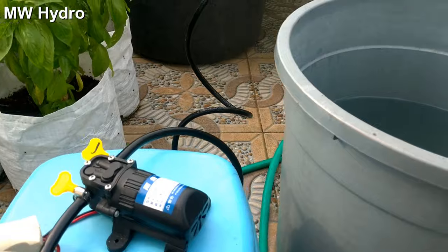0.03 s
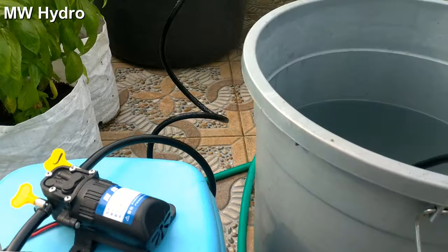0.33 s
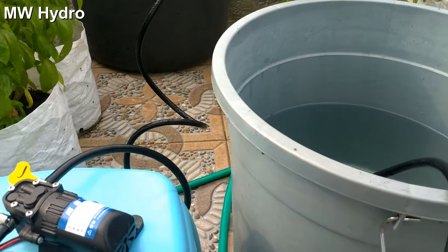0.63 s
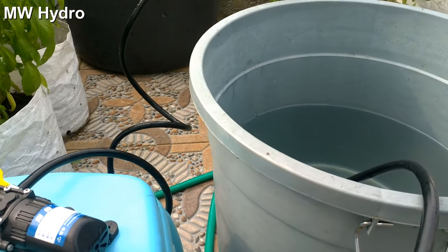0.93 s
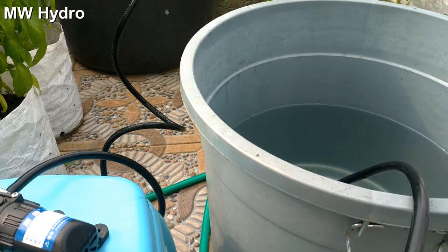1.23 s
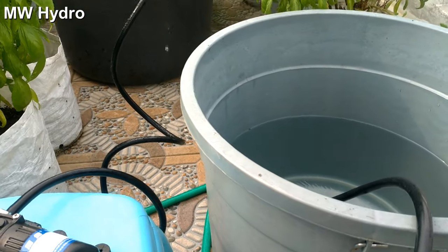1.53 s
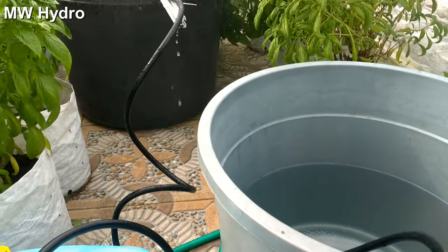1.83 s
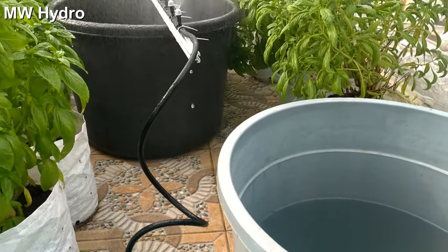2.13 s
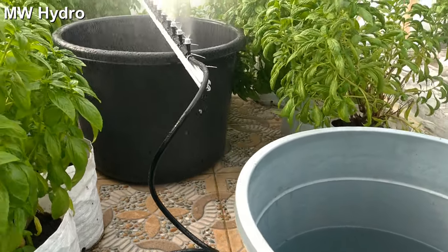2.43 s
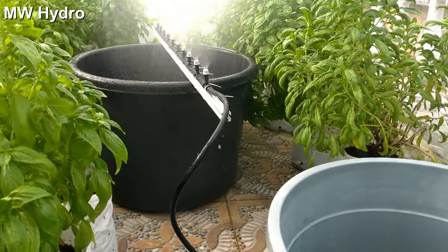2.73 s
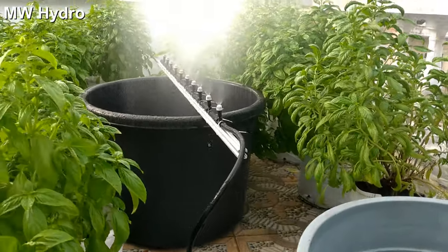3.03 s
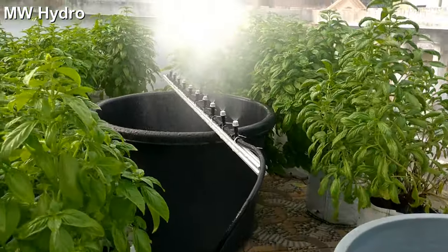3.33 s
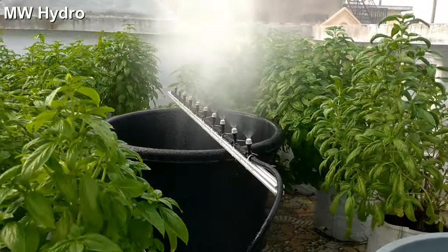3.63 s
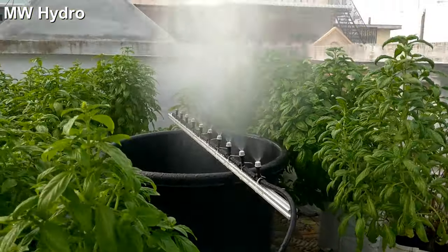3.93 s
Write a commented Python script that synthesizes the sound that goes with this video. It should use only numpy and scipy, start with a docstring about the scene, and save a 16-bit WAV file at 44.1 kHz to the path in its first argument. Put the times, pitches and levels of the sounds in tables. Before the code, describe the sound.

Steady rattling buzz of a small water pump, with fine spray hissing on a patio.

```python
"""Diaphragm pump and misting nozzles

A small electric pump runs steadily on a patio. Each turn of its shaft gives a strong and a weak
stroke, heard as a pulsing hum, and before each stroke a valve shuts with a clack and a spurt.
The microphone drifts from the pump towards a row of nozzles, whose hiss grows and changes colour.
A low outdoor rumble lies underneath."""
import sys
import numpy as np
from scipy import signal
from scipy.fft import rfft, irfft, next_fast_len
from scipy.io import wavfile
from scipy.ndimage import map_coordinates

SR = 44100
rng = np.random.default_rng(int(sys.argv[2]) if len(sys.argv) > 2 else 0)


def generate_wav(signal):
    """Clip the signal to [-1, 1] and save it as 16-bit WAV at the path in sys.argv[1]."""
    frames = np.transpose(np.atleast_2d(signal))
    scaled = np.clip(frames, -1, 1) * 32767
    pcm = np.round(scaled).astype(np.int16)
    wavfile.write(sys.argv[1], SR, pcm)


N = 176400
SHAFT_HZ, FIRST_STROKE_S = 48.578, .01656

# Spectra give relative levels; balance is left minus right; coherence is between the two sides.
# Microphone path from pump (0) to nozzles (1): time_s, way_fraction, left_lead_ms
MIC_PATH = [(0, 0.17, 0.21), (1.0, 0, 0.26), (1.8, 0.07, 0.25), (2.3, 0.52, 0.22), (2.8, 0.86, 0.14),
            (3.5, 0.93, 0.12), (4, 0.87, 0.062)]
# How far the microphone faces the jet: time_s, facing_fraction
MIC_FACING = [(0, 0), (3.15, 0), (3.65, 0.7), (4, 1)]

# Spectrum of the outdoor rumble: frequency_hz, density_db
RUMBLE_SPECTRUM = [(20, -34), (32, -26), (44, -9), (65, -5), (100, -7), (150, -13.5), (250, -12.5),
                   (450, -14.5), (900, -15), (1600, -23.5), (4000, -38)]
# Course of the rumble: time_s, level_db
RUMBLE_ENVELOPE = [(0, -48), (.4, -48), (1.0, -48), (1.5, -50), (2.3, -46), (2.8, -45.5), (3.4, -48.5),
                   (4, -41)]

# Hiss beside the pump, beside the nozzles and facing the jet: frequency_hz, density_db
MIST_AT_PUMP = [(900, -13), (1600, -8.5), (2200, -7), (2900, -2.5), (3700, -5), (4900, -3), (5900, -6),
                (7000, -5.5), (8000, -9.5), (9500, -9), (12000, -13), (14000, -13), (15600, -36)]
MIST_AT_NOZZLES = [(900, -37), (1600, 0), (2000, 6), (2600, -4.5), (3300, -3), (4500, 1), (5700, 1.5),
                   (7000, -3.5), (7800, -10), (9500, -5), (12400, -8), (14000, -12), (15600, -31)]
JET_SPECTRUM = [(800, -16), (1500, -5), (2100, 1), (3200, 2), (4600, -7), (5800, -7), (7500, -12),
                (9500, -4), (13000, -16), (15500, -15)]
# Stereo image of these three hisses: frequency_hz, balance_db
MIST_BALANCE_AT_PUMP = [(1500, -17), (2500, 3.5), (3300, 1), (4500, -2), (6300, -6.5), (7500, 4), (9000, 6),
                        (11000, 1), (15000, -2)]
MIST_BALANCE_AT_NOZZLES = [(1500, 12), (2200, 1), (3200, -12), (5000, -3), (7000, -1), (8000, 1), (9300, 3),
                           (11500, 0), (15000, 0)]
JET_BALANCE = [(2000, -5), (3200, -7.5), (5500, -7), (9000, 1), (12000, -6)]
# Course of the mist and of the head-on jet: time_s, level_db
MIST_ENVELOPE = [(0, -45), (1.2, -46), (2.2, -44.5), (2.9, -43), (3.4, -44), (4, -45)]
JET_ENVELOPE = [(0, -88), (3.2, -54), (3.65, -43.5), (3.9, -43), (4, -40)]
# Left-right likeness of mist, jet and spurts: frequency_hz, coherence
SPRAY_COHERENCE = [(1000, 0.27), (2500, 0.2), (6000, 0.022)]

# The two valves: phase_turns, ring_db, rattle_db, spurt_and_tick_db
VALVE_CLOSINGS = [(-.125, 0, 0, -1), (.36, -6.5, -4, 0)]
# Modes of the pump head, struck by the valves: pitch_hz, bandwidth_hz, gain_db
HEAD_MODES = [(1950, 220, -12), (2200, 100, -12), (2473, 113, 8), (2564, 240, -4.5), (3070, 75, -16)]
# Spectra of the noises of a closing: frequency_hz, density_db
TICK_SPECTRUM = [(1200, -3), (1700, 2), (2800, 6), (4200, 7.5), (5700, -7), (7500, -6), (10000, -5),
                 (15000, -19)]
RATTLE_SPECTRUM = [(150, -11), (300, -1), (480, -12), (700, 0.5), (950, -0.5), (1300, -4.5), (1650, -14.5),
                   (2100, -3.5), (2600, -6), (3200, -19), (6000, -40)]
SPURT_SPECTRUM = [(1000, -6), (2500, -17), (4000, 0), (6500, 1), (8000, -7.5), (10000, -4.5),
                  (13500, -11.5), (15500, -13)]
# Stereo image of rattle and spurt: frequency_hz, balance_db
RATTLE_BALANCE = [(300, 8), (1200, 5.5), (2200, 4.5)]
SPURT_BALANCE = [(3000, -7), (6000, 0), (9000, 5), (13000, 8)]
# Left-right likeness of the rattle: frequency_hz, coherence
RATTLE_COHERENCE = [(300, .95), (700, 0.73), (1300, 0.12), (2500, 0.13)]
# Course of the head's ring and rattle: time_s, level_db
RING_ENVELOPE = [(0, -52), (.9, -49), (1.7, -49), (2.3, -50.5), (2.9, -49), (4, -51)]
RATTLE_ENVELOPE = [(0, -43), (2, -44.5), (3, -42.5), (4, -40.5)]

# The two diaphragm strokes: phase_turns, relative_strength
DIAPHRAGM_STROKES = [(0, 1), (.462, .37)]
# Modes rung by the strokes and by the first valve's knock: pitch_hz, bandwidth_hz, signed_gain
HOUSING_MODES = [(223, 77, .6), (420, 227, -1.04), (696, 90, -1.45)]
KNOCK_MODES = [(1040, 300, 0.47)]
# Harmonics of the hum at the two ends of the path: shaft_multiple, level_db
HUM_AT_PUMP = [(1, -24.5), (2, -18), (3, -12), (4, 1), (5, -5), (6, -2.5), (7, -5.5), (8, -28.5), (9, -17),
               (10, -31.5), (11, -24), (12, -22.5), (13, -9), (14, -19), (15, -9), (16, -26), (17, -17),
               (18, -19), (19, -14), (20, -17), (21, -21.5), (22, -26), (23, -21), (24, -27.5), (25, -18.5),
               (26, -23.5), (27, -16), (28, -22.5), (29, -23.5), (30, -22), (31, -43), (32, -22.5)]
HUM_AT_NOZZLES = [(1, -26.5), (2, -16.5), (3, -10.5), (4, 2), (5, -7), (6, -2.5), (7, -5.5), (8, -12.5),
                  (9, -12), (10, -26), (11, -24.5), (12, -33.5), (13, -9), (14, -13.5), (15, -8), (16, -18),
                  (17, -23), (18, -39), (19, -21), (20, -18), (21, -18.5), (22, -23.5), (23, -19),
                  (24, -30), (25, -20.5), (26, -31), (27, -16.5), (28, -22), (29, -23.5), (30, -27),
                  (31, -31), (32, -27)]
# Change in the harmonics when facing the jet: shaft_multiple, change_db
HUM_FACING_CHANGE = [(5, -1.5), (6, -2), (7, -2), (8, 2), (10, 7), (13, -3), (14, 5), (17, 5)]
# Stereo image of the hum: frequency_hz, balance_db
HUM_BALANCE = [(50, 3), (200, 1.5), (300, 2.5), (450, 2.5), (700, 2), (1000, -4), (1400, 3)]


def amp(db):
    """Amplitude grows tenfold for every 20 dB."""
    return 10 ** (np.asarray(db) / 20)


def unit_rms(x):
    """Normalisation to unit mean power."""
    return x / np.sqrt(np.mean(x ** 2) + 1e-20)


def along(points, hz):
    """Interpolation on a logarithmic frequency axis."""
    knots_hz, values = np.transpose(points)
    return np.interp(np.log(hz + 1), np.log(knots_hz + 1), values)


def curve(rows, column=1):
    """Linear interpolation in time, one value per sample."""
    rows = np.array(rows)
    return np.interp(np.arange(N) / SR, rows[:, 0], rows[:, column])


def wobble(knots_per_s):
    """Smooth fluctuation: a spline through random knots."""
    knots = rng.standard_normal(int(N * knots_per_s / SR) + 4)
    return map_coordinates(knots, [np.arange(N) * knots_per_s / SR])


def pan(balance_db):
    """Level difference, shared between left and right gains."""
    return amp(np.array([[.5], [-.5]]) * balance_db)


def right_lag(hz, lag_s):
    """Arrival-time difference: a linear phase delays the right side."""
    return np.array([np.ones_like(hz), np.exp(-2j * np.pi * hz * lag_s)])


def filtered(x, response):
    """Linear filtering: the spectrum is multiplied by a frequency response."""
    size = next_fast_len(N + SR // 2)
    return irfft(rfft(x, size) * response(np.fft.rfftfreq(size, 1 / SR)), size)[..., :N]


def resonances(modes, hz):
    """Modal superposition: the responses of damped oscillators add."""
    return sum(gain * 1j * hz * width / (pitch ** 2 - hz ** 2 + 1j * hz * width)
               for pitch, width, gain in modes)


def decaying(hits, decay_s):
    """Exponential decay after each impulse, as an envelope of unit rms."""
    return unit_rms(signal.lfilter([1], [1, -np.exp(-1 / (decay_s * SR))], hits))


def noise(spectrum, coherence, balance):
    """Partly coherent stereo noise: the ratio of mid to side sets the likeness of left and right."""
    def mid_side_gains(hz):
        angle = np.arccos(np.clip(along(coherence, hz), -1, 1)) / 2
        return np.array([np.cos(angle), np.sin(angle)])
    mid, side = filtered(rng.standard_normal((2, N)), mid_side_gains)
    colour = lambda hz: amp(along(spectrum, hz)) * pan(along(balance, hz))
    return unit_rms(filtered(np.array([mid + side, mid - side]), colour))


def outdoor_rumble(swell_db=1.8):
    """Ambient noise swells gently; its coherence falls as frequency rises."""
    rumble = noise(RUMBLE_SPECTRUM, coherence=[(100, .94), (400, .59), (1500, .1)], balance=[(100, 1)])
    return amp(curve(RUMBLE_ENVELOPE) + swell_db * wobble(5.6)) * rumble


def nozzle_mist(way):
    """Spray radiates broadband noise; independent hisses add in power, the head-on jet joining last."""
    at_pump = noise(MIST_AT_PUMP, SPRAY_COHERENCE, MIST_BALANCE_AT_PUMP)
    at_nozzles = noise(MIST_AT_NOZZLES, SPRAY_COHERENCE, MIST_BALANCE_AT_NOZZLES)
    jet = noise(JET_SPECTRUM, SPRAY_COHERENCE, JET_BALANCE)
    hiss = np.sqrt(1 - way) * at_pump + np.sqrt(way) * at_nozzles
    return amp(curve(MIST_ENVELOPE)) * hiss + amp(curve(JET_ENVELOPE)) * jet


def valve_impacts(turns, phase, jitter_s=12e-6, scatter_db=1.62):
    """A nearly periodic impulse train: the valve shuts once a turn, varying in time and force."""
    due = np.interp(np.arange(1, int(turns[-1] - phase) + 1) + phase, turns, np.arange(N))
    jitter = jitter_s * SR * rng.standard_normal(len(due))
    at = np.clip(np.round(due + jitter).astype(int), 0, N - 1)
    hits = np.zeros(N)
    hits[at] = amp(scatter_db * rng.standard_normal(len(at)))
    return hits


def seat_ticks(hits, way, decay_s=.0073, size=1024):
    """Convolution repeats one dry tick of valve on seat; its fine colour shifts along the path."""
    bursts = rng.standard_normal((2, 2, size)) * np.exp(-np.arange(size) / (decay_s * SR))
    at_pump, at_nozzles = (unit_rms(signal.fftconvolve(hits[None], burst, axes=1)[:, :N])
                           for burst in bursts)
    return np.sqrt(1 - way) * at_pump + np.sqrt(way) * at_nozzles


def head_ring(blows, balance_db=8):
    """Free vibration: each blow rings the modes of the pump head, which alternate in sign."""
    modes = [(pitch, width, (-1) ** k * amp(db)) for k, (pitch, width, db) in enumerate(HEAD_MODES)]
    ring = filtered(blows, lambda hz: resonances(modes, hz) * right_lag(hz, lag_s=.00034))
    return amp(curve(RING_ENVELOPE)) * pan(balance_db) * unit_rms(ring)


def head_rattle(shakes, decay_s=.012):
    """Damped irregular vibration: each closing shakes a burst of noise from the pump head."""
    rattle = noise(RATTLE_SPECTRUM, RATTLE_COHERENCE, RATTLE_BALANCE)
    rattle = filtered(rattle, lambda hz: right_lag(hz, lag_s=.00013))
    return amp(curve(RATTLE_ENVELOPE)) * decaying(shakes, decay_s) * rattle


def valves(turns, way, tick_db=-51.5, spurt_db=-53):
    """Impact excitation: each closing ticks, rings and rattles the head, and lets out a short spurt."""
    blows, shakes, releases, ticks = np.zeros(N), np.zeros(N), np.zeros(N), np.zeros((2, N))
    for phase, ring_db, rattle_db, spurt_and_tick_db in VALVE_CLOSINGS:
        hits = valve_impacts(turns, phase)
        blows += amp(ring_db) * hits
        shakes += amp(rattle_db) * hits
        releases += amp(spurt_and_tick_db) * hits
        ticks += amp(spurt_and_tick_db) * seat_ticks(hits, way)
    head = head_ring(blows) + head_rattle(shakes)
    tick = unit_rms(filtered(ticks, lambda hz: amp(along(TICK_SPECTRUM, hz))))
    spurt = decaying(releases, decay_s=.0027) * noise(SPURT_SPECTRUM, SPRAY_COHERENCE, SPURT_BALANCE)
    return head + amp(tick_db) * tick + amp(spurt_db) * spurt


def pressure_cycle(harmonics, size=2048):
    """Fourier series of one turn: strokes and knock set the phases, the harmonic levels the colour."""
    multiples, level_db = np.transpose(harmonics)
    hz = multiples * SHAFT_HZ
    delay = lambda phase: np.exp(-2j * np.pi * multiples * phase)
    strokes = sum(strength * delay(phase) for phase, strength in DIAPHRAGM_STROKES)
    knock = resonances(KNOCK_MODES, hz) * delay(VALVE_CLOSINGS[0][0])
    response = resonances(HOUSING_MODES, hz) * strokes + knock
    lines = -amp(level_db) * response / np.abs(response) * pan(along(HUM_BALANCE, hz))
    return unit_rms(irfft(np.pad(lines, ((0, 0), (1, 0))), size))  # the padding is the zero at 0 Hz


def diaphragm_hum(turns, way, pump_db=-28.5, nozzles_db=-28, flutter_db=.25):
    """Periodic forcing gives harmonics of the shaft rate, whose levels depend on where one listens."""
    left_lead_s = curve(MIC_PATH, column=2) / 1000
    stereo_turns = turns + np.array([[.5], [-.5]]) * left_lead_s * SHAFT_HZ

    def tone(harmonics):
        return np.array([np.interp(phase, np.arange(len(cycle)) / len(cycle), cycle, period=1)
                         for phase, cycle in zip(stereo_turns, pressure_cycle(harmonics))])
    facing = np.clip(curve(MIC_FACING), 0, 1)
    head_on = [(k, db + dict(HUM_FACING_CHANGE).get(round(k), 0)) for k, db in HUM_AT_NOZZLES]
    turning = (1 - facing) * tone(HUM_AT_NOZZLES) + facing * pan(balance_db=-1) * tone(head_on)
    at_pump = amp(pump_db) * tone(HUM_AT_PUMP)
    at_nozzles = amp(nozzles_db) * pan(balance_db=-.5) * turning
    return ((1 - way) * at_pump + way * at_nozzles) * amp(flutter_db * wobble(SHAFT_HZ))


def scene(wander_turns=.0015):
    """Superposition: hum and valves, locked to one slightly unsteady shaft, add to mist and rumble."""
    turns = (np.arange(N) / SR - FIRST_STROKE_S) * SHAFT_HZ + wander_turns * wobble(knots_per_s=5)
    way = np.clip(curve(MIC_PATH), 0, 1)
    return diaphragm_hum(turns, way) + valves(turns, way) + nozzle_mist(way) + outdoor_rumble()


def record(dry, start_s=.046, fade_s=.002, cutoff_hz=15750):
    """Gating and band limiting: a moment of silence, then the sound below the cutoff."""
    gate = np.clip((np.arange(N) / SR - start_s) / fade_s, 0, 1)
    return filtered(dry * gate, lambda hz: hz < cutoff_hz)


dry = scene()
out = record(dry)
generate_wav(out)
```